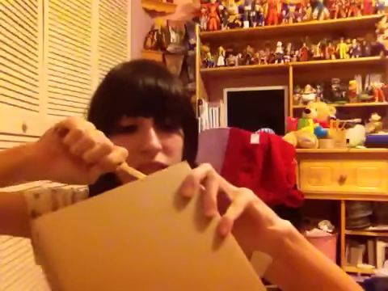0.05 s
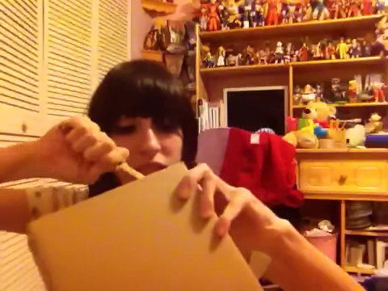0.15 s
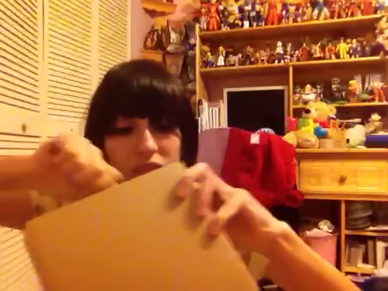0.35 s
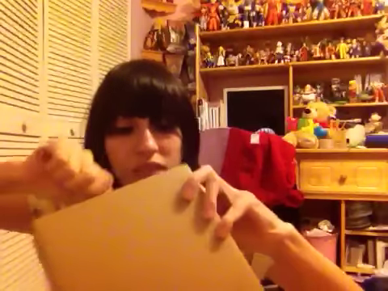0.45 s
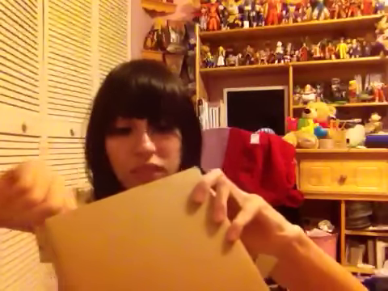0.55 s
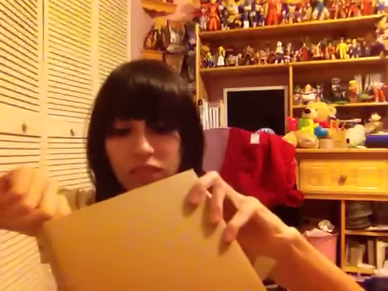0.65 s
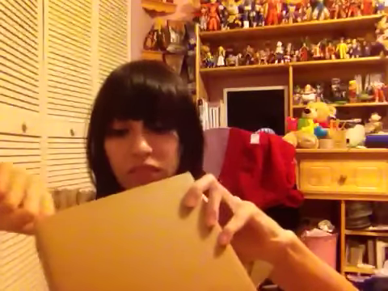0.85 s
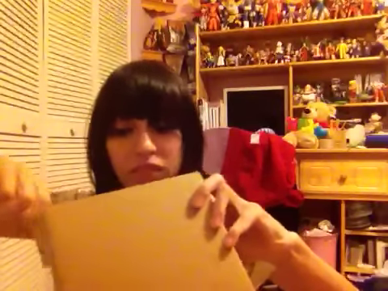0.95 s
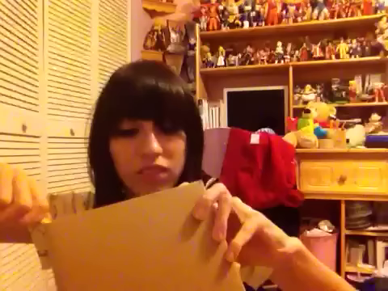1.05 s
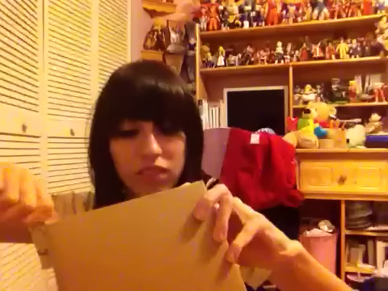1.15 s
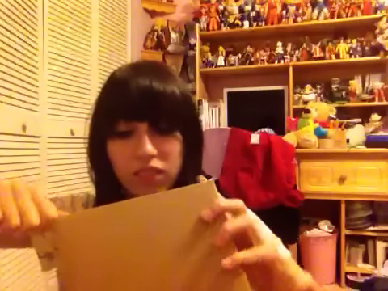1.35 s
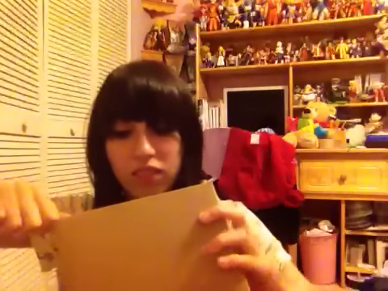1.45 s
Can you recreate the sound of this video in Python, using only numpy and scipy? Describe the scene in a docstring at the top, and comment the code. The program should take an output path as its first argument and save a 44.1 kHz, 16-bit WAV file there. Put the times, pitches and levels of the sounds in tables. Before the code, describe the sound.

Cardboard carton being cut open close by: crisp rip, boxy thumps, then faint rasping and rustling

```python
"""Slitting a cardboard package, close by

A blade slits the edge of a carton held near a small microphone in a quiet furnished room.
Tape and fibres snap as ringing clicks, and blade blows push the hollow box into resonance.
Strokes are dense runs of fibre clicks that drum the walls, rasp in the middle and hiss on top.
Blade chatter whistles faintly; the room answers the snaps, the first rip and the knocks over a hush."""
import sys
import numpy as np
from scipy import signal
from scipy.io import wavfile
from scipy.ndimage import uniform_filter1d

SR = 44100
rng = np.random.default_rng(int(sys.argv[2]) if len(sys.argv) > 2 else 0)


def transcribe(signal):
    """Save signal, clipped to [-1, 1], as a 16-bit WAV file at the path in sys.argv[1]."""
    frames = np.atleast_2d(signal).T
    limited = np.clip(frames, -1, 1)
    pcm = np.round(limited * 32767).astype(np.int16)
    wavfile.write(sys.argv[1], SR, pcm)


def ratio(d):
    """dB to gain"""
    e = np.asarray(d, float) / 20
    return 10 ** e


N = 66150  # 1.5 s


def evened(x):
    """Scales a sound to an rms of 1."""
    return x / np.sqrt(np.mean(x ** 2) + 1e-20)


def read(points, hz):
    """Reads a curve of (f/Hz, value) along a logarithmic frequency axis."""
    f, value = np.transpose(points)
    return np.interp(np.log(hz + 1), np.log(f + 1), value)


def add(mix, s, sound):
    """Lays a sound into the mix at s seconds, cut off at the end."""
    part = mix[round(s * SR):][:len(sound)]
    part += sound[:len(part)]


def colour(x, points):
    """Minimum-phase filter shaped like the given spectrum, with unit energy."""
    hz = abs(np.fft.fftfreq(4096, 1 / SR))
    log_gain = np.log(ratio(np.maximum(read(points, hz), -80)))
    taps = np.fft.ifft(np.exp(np.conj(signal.hilbert(log_gain)))).real[:2048]
    return signal.oaconvolve(x, taps / np.linalg.norm(taps))[:len(x)]


def resonate(x, hz, width):
    """One resonance of gain 1, fixed or moving, that starts from rest."""
    turn = np.exp(2j * np.pi * np.cumsum(hz * np.ones(len(x))) / SR)
    r = np.exp(-np.pi * width / SR)
    # shift the resonance down to 0 Hz, smooth there, shift back
    return 2 * (turn * signal.lfilter([1 - r], [1, -r], x / turn)).imag


def fibres(per_s, spread_db, clump_db, clump_s):
    """Breaking fibres: clicks of random sign and size, coming in clumps."""
    size = ratio(spread_db * np.minimum(rng.exponential(1, N), 4)) * rng.standard_normal(N)
    clumps = evened(uniform_filter1d(rng.standard_normal(N), max(round(clump_s * SR), 1)))
    breaks = rng.random(N) < per_s / SR
    return evened(size * breaks * ratio(clump_db * clumps))


# resonances of the hollow carton: f/Hz
BOX_HZ = [282, 340, 472, 515, 655, 720, 782, 1120, 1250, 1620, 1990, 2400, 2720]
# the same resonances in order: width/Hz, level/dB
BOX_MODES = [(32.7, 0.5), (39.4, -6), (24.5, 0), (24.5, -3), (35.7, 4.5), (30.2, 7), (40, -9.5), (118, -6),
             (101, -12), (103, -2), (119, -6.5), (80, -8.5), (120, -10)]
BOX_LOW_HZ = 281  # a box this small sends out little bass


def box(push):
    """The carton rings in all its resonances when pushed, and radiates little bass."""
    ring = sum(ratio(db) * resonate(push, hz, width) for hz, (width, db) in zip(BOX_HZ, BOX_MODES))
    return signal.sosfilt(signal.butter(3, BOX_LOW_HZ, "high", fs=SR, output="sos"), ring)


# blade and hands on the card, first cut and later ones:
# t/s, thud level/dB, air hum level/dB, wall drumming level/dB, rasp level/dB, fibre hiss level/dB
FIRST_CUT = [(.257, -60, -56, -50, -43, -39), (.268, -60, -56, -50, -43, -41),
             (.284, -60, -54, -47, -43, -44), (.314, -60, -55, -51, -48, -46)]
LATER_CUTS = [(0.334, -60, -47.5, -36.5, -44, -42), (0.372, -70, -58, -65, -54, -55.5),
              (0.384, -79, -63, -48, -48, -56.5), (0.398, -87, -68, -56.5, -58, -60),
              (0.42, -72, -57, -67, -55, -59), (0.472, -84, -73, -63, -64, -67),
              (0.514, -85, -60, -53, -63, -70), (0.528, -65, -45.5, -50, -55, -63),
              (0.54, -64, -40.5, -46.5, -49.5, -56), (0.56, -71, -39, -40, -44.5, -48.5),
              (0.606, -62, -52.5, -44.5, -47.5, -48.5), (0.642, -62, -53, -60.5, -59, -57),
              (0.684, -75, -67.5, -74, -68.5, -70.5), (0.7, -76, -75, -62.5, -71, -74),
              (0.742, -67, -55, -59.5, -62, -60), (0.762, -79, -55.5, -61, -68.5, -64),
              (0.814, -79, -65, -71, -63, -66), (0.84, -70, -64.5, -68, -66, -59),
              (0.862, -68, -64, -72, -72, -66), (0.898, -88, -66, -67.5, -77, -64),
              (0.946, -79, -63, -67, -59, -62.5), (0.97, -83, -63.5, -57.5, -67, -62),
              (0.998, -70, -53.5, -57.5, -59, -58), (1.038, -91, -56, -55.5, -68, -64.5),
              (1.07, -73, -54, -58.5, -44, -42.5), (1.096, -66, -50, -52, -56, -48.5),
              (1.106, -51, -43.5, -58.5, -48.5, -53), (1.116, -72, -53.5, -62, -57, -57.5),
              (1.132, -75, -64, -60.5, -58.5, -63), (1.164, -65, -68, -74, -68, -69),
              (1.178, -86, -78, -66, -74, -77), (1.2, -67, -68, -70, -74, -78),
              (1.23, -98, -71, -83, -72, -77), (1.236, -98, -78, -70, -65, -72),
              (1.258, -96, -69.5, -64.5, -70.5, -69.5), (1.31, -67, -69, -73, -67, -65.5),
              (1.33, -72, -61, -63.5, -70, -63), (1.366, -86, -87, -66, -64.5, -65.5),
              (1.386, -91, -70, -66, -68, -64.5), (1.434, -63, -61, -73, -66, -63.5),
              (1.46, -78, -64.5, -71, -67.5, -62.5), (1.5, -64, -70, -76, -73, -61)]
# hum of the air inside, moving as the flap is pulled: t/s, f/Hz
AIR = [(0.25, 392), (0.378, 393), (0.5, 280), (0.548, 300), (0.594, 358), (0.674, 357), (0.702, 367),
       (0.886, 309), (0.938, 362), (1.05, 383), (1.122, 315), (1.164, 358), (1.21, 303), (1.256, 341),
       (1.432, 333), (1.5, 310)]
AIR_WIDTH_HZ = 95  # of each of two passes
# broad sound of the panels: f/Hz, level/dB
PANEL = [(60, -70.5), (180, -13), (300, -4.5), (700, -9), (1000, -24.5), (2000, -39.5), (5000, -82)]
PANEL_DB = -8  # against the ringing walls
# the whole package shifting: f/Hz, level/dB
THUD = [(20, -50), (70, -13.5), (130, 2.5), (190, 0), (300, -10), (800, -85)]
# middle range of the tearing: f/Hz, level/dB
RASP = [(470, -38), (800, 1), (1220, 3), (1330, 2.5), (2150, -7.5), (2370, -4.5), (2670, -8), (4000, -8.5),
        (5200, -11), (8800, -120)]
# top range of the tearing: f/Hz, level/dB
HISS = [(1470, -43), (2500, -12.5), (2660, -7), (3380, -4.5), (5230, -10), (6550, -5), (9150, -9),
        (12200, -9.5), (15200, -14.5), (16000, -9)]
RIP_S = .2416  # the rip and the strokes start here


def strokes():
    """Fibre clicks excite the enclosed air, walls, rasp and hiss; noise makes the package thud."""
    s, *dbs = np.vstack([FIRST_CUT, LATER_CUTS]).T
    t = np.arange(N) / SR
    thud, air, wall, rasp, hiss = (ratio(np.interp(t, s, db)) * (t > RIP_S) for db in dbs)
    push = fibres(4000, 0.91, 0.89, 0.016)
    air_hz = np.interp(t, *np.transpose(AIR))
    hum = air * evened(resonate(resonate(push, air_hz, AIR_WIDTH_HZ), air_hz, AIR_WIDTH_HZ))
    ring = box(wall * push) / np.std(box(push))
    panels = ratio(PANEL_DB) * colour(wall * push, PANEL)
    shift = colour(thud * rng.standard_normal(N), THUD)
    middle = colour(rasp * fibres(9000, 1.1, 0.78, 0.0027), RASP)
    top = colour(hiss * fibres(20000, 0.49, 1.0, 0.0027), HISS)
    return shift + hum + ring + panels + middle + top


# spectrum of the tearing tape: f/Hz, level/dB
RIP_COLOUR = [(200, -40), (500, -28), (900, 1), (2200, 11), (4000, 9.5), (5300, -0.5), (7000, 6),
              (10000, -4), (13000, 4.5), (15500, -23)]
RIP_LENGTH_S, RIP_DB = .0135, -29


def rip():
    """The tape tears evenly for a moment, then stops: a gated run of fibre clicks."""
    t = np.arange(N) / SR - RIP_S
    gate = np.clip(t / .0005, 0, 1) * np.clip((RIP_LENGTH_S - t) / .002, 0, 1)
    return ratio(RIP_DB) * colour(gate * fibres(12000, 0.57, 1.2, 0.0028), RIP_COLOUR)


# fibres and tape breaking: t/s, peak level/dB, centre f/Hz, width/Hz of each of two passes, t60/s
SNAPS = [(0.2416, -10, 6500, 3480, 0.005), (0.2423, -20.5, 12400, 2950, 0.0036),
         (0.2423, -18.5, 2160, 1200, 0.0074), (0.244, -20, 883, 345, .02), (0.2454, -26, 1620, 1480, .008),
         (0.252, -46, 7000, 3000, 0.0036), (0.3215, -24.5, 5070, 9100, 0.01),
         (0.3207, -26, 6400, 9100, 0.038), (0.3235, -21.5, 1316, 820, 0.01),
         (.9030, -52, 1520, 1500, 0.014), (0.9352, -47, 7600, 6000, 0.0045),
         (1.2370, -45.5, 6070, 4000, .009), (1.2375, -48.5, 4700, 785, 0.014),
         (1.2375, -62, 1480, 1200, 0.015), (1.244, -57, 11000, 3000, .008), (1.245, -53, 4650, 1500, 0.011)]


def snaps():
    """A break is a click with a dying crackle behind it, in one band."""
    out, t = np.zeros(N), np.arange(2000) / SR
    for (s, db, hz, width, t60), crackle in zip(SNAPS, rng.standard_normal((len(SNAPS), 2000))):
        click = 2.22 * (t == 0)
        source = (click + crackle) * ratio(-60 * t / t60)
        burst = resonate(resonate(source, hz, width), hz, width)
        add(out, s, ratio(db) * burst / abs(burst).max())
    return out


# blows on the carton: t/s, peak level/dB that an instant blow as strong would have, contact/ms
KNOCKS = [(.1480, -46.5, 2.25), (.2426, -32, 0.22), (.3218, -25, 1.5), (.3234, -10, 0.68),
          (.3395, -28, 2.1), (.3850, -33.5, 0.47), (.5360, -42, 1.8), (0.555, -27.5, 0.55),
          (.5620, -16, 2.26), (1.1000, -27, 3)]


def knocks():
    """Each blow is a short smooth push into the box; longer contact is duller."""
    push, unit = np.zeros(N), np.zeros(N)
    unit[0] = 1
    for s, db, ms in KNOCKS:
        shape = np.hanning(round(ms * SR / 1000) + 3)
        add(push, s, ratio(db) * shape / shape.sum())
    return box(push) / abs(box(unit)).max()


# blade chatter, a fuzzy whistle: start t/s, length/s, rms level/dB before the arch,
# f/Hz, width/Hz of each of two passes
SQUEAKS = [(.600, .02, -56, 3300, 300), (.790, .06, -74, 4700, 1200), (.955, .03, -60, 11300, 900),
           (1.053, .035, -45, 3900, 1800), (1.058, .026, -49, 1720, 300), (1.410, .04, -65, 1150, 120)]


def squeaks():
    """Blade chatter: noise through a steep resonance under a soft arch."""
    out = np.zeros(N)
    for (s, length, db, hz, width), noise in zip(SQUEAKS, rng.standard_normal((len(SQUEAKS), 4410))):
        arch = np.sin(np.pi * np.clip(np.arange(4410) / SR / length, 0, 1) ** 0.83)
        whistle = evened(resonate(resonate(noise, hz, width), hz, width))
        add(out, s, ratio(db) * arch * whistle)
    return out


# decay of the furnished room: f/Hz, t60/s
ROOM_T60 = [(200, 0.26), (1000, 0.23), (4000, 0.24), (12000, 0.11)]
ROOM_DB = -12


def room(x):
    """Reflections as sparse taps of random sign, each band dying at its own speed."""
    taps = np.zeros(SR // 2)
    at = np.arange(260, SR // 2 - 20, 20)  # the first reflection comes after about 6 ms
    taps[at + rng.integers(0, 20, len(at))] = rng.choice([-1., 1.], len(at))
    hz, t, z = signal.stft(taps, SR, nperseg=256)
    decay = ratio(-60 * t / read(ROOM_T60, hz)[:, None])
    tail = signal.istft(z * decay, SR, nperseg=256)[1]
    return signal.fftconvolve(x, tail / np.linalg.norm(tail))[:N]


# spectrum of the quiet room: f/Hz, level/dB
FLOOR = [(18, -54), (30, -34), (145, -18), (161, -10.5), (227, -8), (404, -18), (4420, -25.5),
         (5590, -25.5), (10500, -32.5), (14800, -23.5), (16000, -38)]
FLOOR_DB = -70


def hush():
    """The room at rest: steady coloured noise."""
    return ratio(FLOOR_DB) * evened(colour(rng.standard_normal(N), FLOOR))


def scene():
    """Hits and their echo in the room, over the close strokes, squeaks and the hush."""
    hits = knocks() + snaps() + rip()
    rest = hush()
    return (hits + ratio(ROOM_DB) * room(hits) + strokes() + squeaks() + rest)[None]


def top_cut(x):
    """Nothing passes above the cut-off."""
    return signal.sosfilt(signal.butter(12, 16520, fs=SR, output="sos"), x)


MIC_LOW_HZ, EDGE_HZ = 162, 15250


def record(dry):
    """Small close microphone without deep bass, then a steep upper band limit."""
    thin = signal.sosfilt(signal.butter(2, MIC_LOW_HZ, "high", fs=SR, output="sos"), dry)
    edge = signal.firwin(511, EDGE_HZ, window=("kaiser", 5), fs=SR)[None]
    mix = signal.oaconvolve(thin, edge, "same")
    return top_cut(mix)


dry = scene()
out = record(dry)
transcribe(out)
```